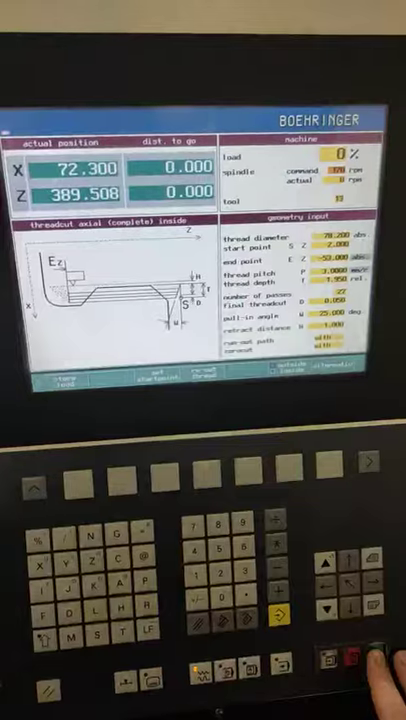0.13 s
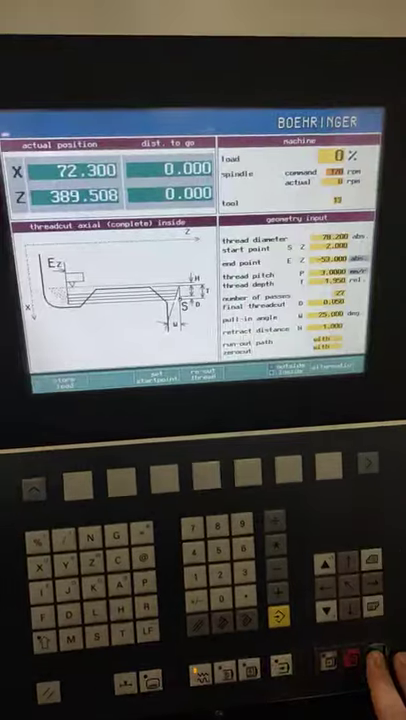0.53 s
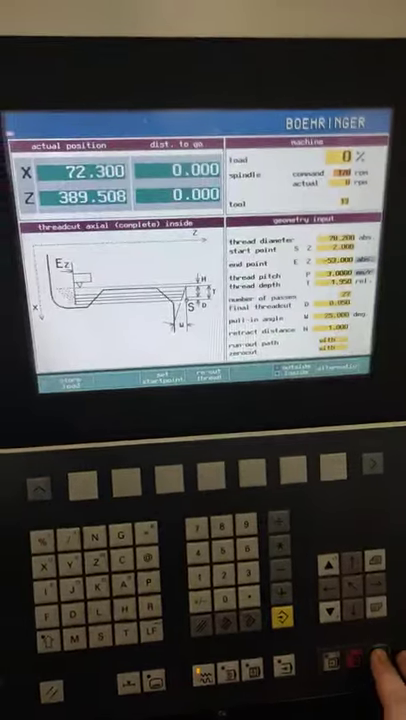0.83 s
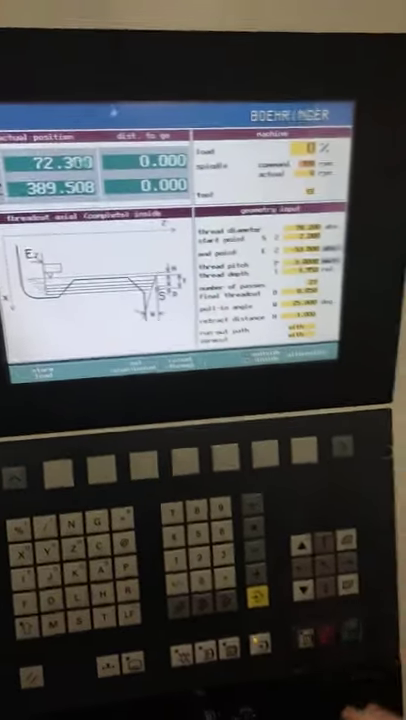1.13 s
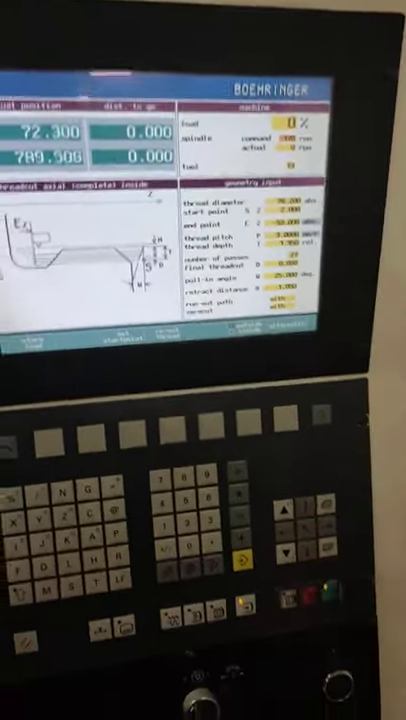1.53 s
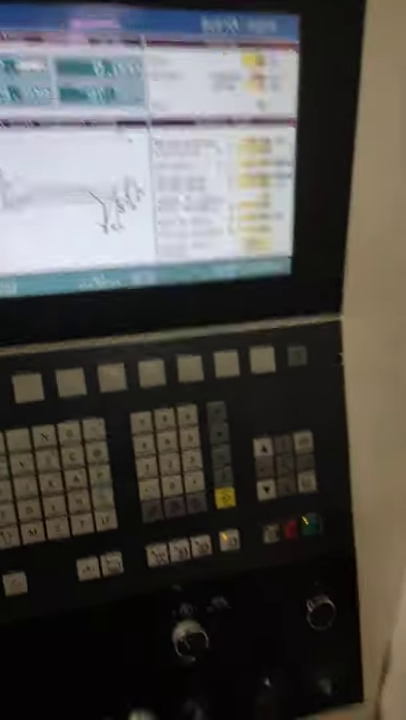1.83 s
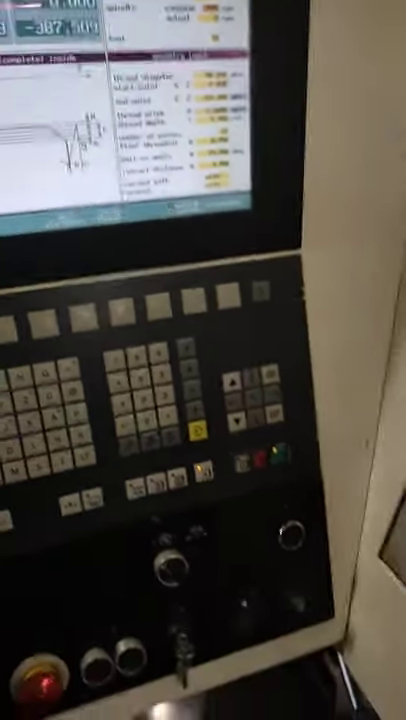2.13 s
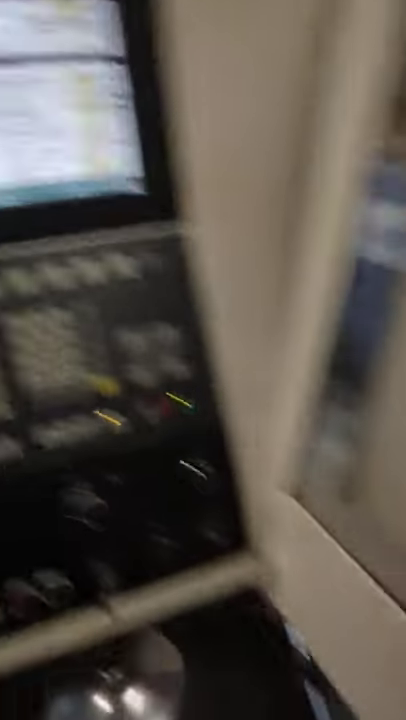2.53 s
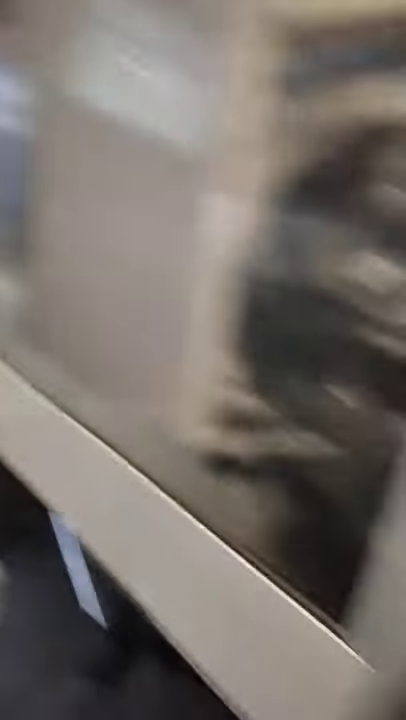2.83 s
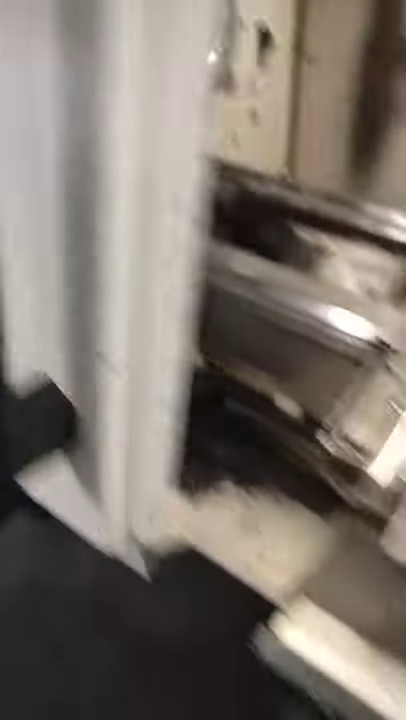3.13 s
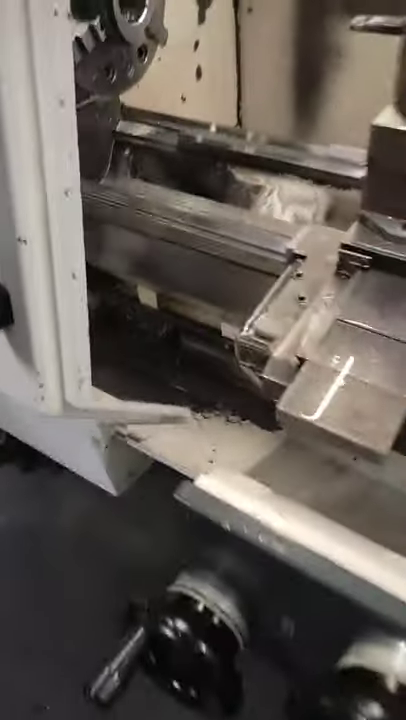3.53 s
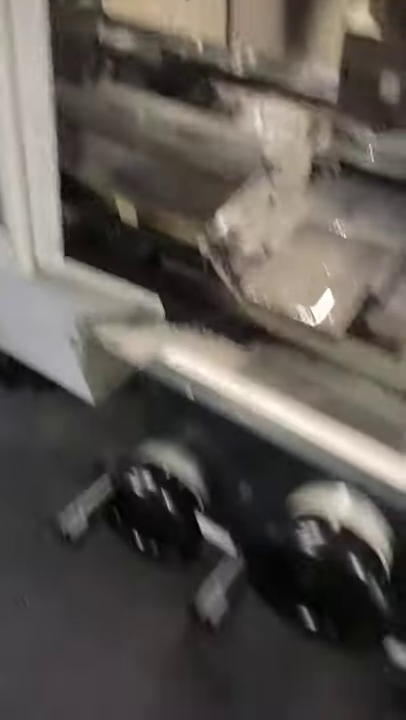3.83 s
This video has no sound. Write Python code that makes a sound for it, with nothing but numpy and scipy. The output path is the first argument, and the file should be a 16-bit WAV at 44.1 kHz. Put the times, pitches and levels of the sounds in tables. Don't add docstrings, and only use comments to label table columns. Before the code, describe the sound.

After a brief silence, a lathe's steady hum and fan whoosh cut in abruptly; dull slide thumps knock the bed, pause, then return near the end under brighter hiss, captured by a handheld stereo phone indoors.

```python
import sys
import numpy as np
from scipy import signal
from scipy.fft import rfft, irfft, next_fast_len
from scipy.io import wavfile
from scipy.ndimage import uniform_filter1d, map_coordinates

SR = 44100
rng = np.random.default_rng(int(sys.argv[2]) if len(sys.argv) > 2 else 0)


def linear_from_db(decibels):
    return 10 ** (np.asarray(decibels, float) / 20)


def dump_mix(stems):
    frames = np.atleast_2d(stems).T
    limited = np.clip(frames, -1, 1)
    pcm = np.round(limited * 32767).astype(np.int16)
    wavfile.write(sys.argv[1], SR, pcm)


N = 176400

# pitch in [Hz],
# left level first, left last, right first, right last in [dB].
MACHINE_LINES = [(48.4, -47, -44, -46, -44), (101, -29, -37, -30, -38), (144.3, -30, -33, -30, -33),
                 (185, -33, -38, -33, -38), (399, -32, -36, -34, -35), (799, -42, -43, -42, -42),
                 (1060, -50, -42, -37, -41), (1133, -25, -34, -50, -38), (1206, -30, -32, -26, -32),
                 (1269, -44, -40, -42, -41), (1599, -49, -40, -36, -40), (1687, -41, -55, -55, -50),
                 (1745, -52, -39, -48, -39), (1998, -48, -55, -40, -41), (2018, -40, -48, -47, -40),
                 (2046, -48, -46, -37, -41), (4037, -58, -51, -55, -53), (4560, -58, -58, -66, -52),
                 (5146, -58, -52, -54, -56), (10141, -48, -52, -63, -59), (10544, -57, -54, -66, -69),
                 (7930, -61, -57, -51, -49), (8000, -55, -49, -47, -47), (8071, -55, -59, -46, -51)]
# start in [s], level in [dB], start pitch in [Hz], rest pitch in [Hz],
# 60 dB decay time in [s].
BED_THUMPS = [(0.594, -13, 236, 172, 0.55), (.655, -11, 150, 133.3, 0.57), (.77, -11.5, 201, 190, 0.2),
              (.85, -16, 109.4, 102, .5), (1.16, -10, 196.5, 192, 0.16), (1.722, -16.5, 108.4, 103.4, 0.86),
              (1.55, -21.5, 143.8, 142.2, 1.15), (1.801, -23.5, 133, 154, 1.2),
              (1.87, -14.5, 105.7, 103, 0.58), (2.27, -15.5, 147.3, 142.8, 0.87),
              (3.631, -17, 158, 148, 0.34), (1.894, -8.5, 175, 187, 0.48), (2.04, -12.5, 190, 150, 0.35),
              (2.2, -11.5, 189, 183, 0.42), (2.98, -34, 301, 298.4, 0.65), (3.52, -20, 214, 204, 0.37),
              (3.891, -19.5, 264.5, 230, 0.28)]
# time in [s], air hiss in [dB],
# left port hiss in [dB], right port hiss in [dB].
TURN_TO_DOOR = [(0.4, -33, -32, -55), (1.86, -34.5, -32, -44), (1.94, -38, -34, -42),
                (2.17, -32.5, -31, -38), (2.34, -33.5, -31, -36), (2.51, -29, -30, -36),
                (3.33, -29, -26.5, -40.5), (3.66, -30.5, -26.5, -38), (3.68, -27, -24, -42),
                (3.82, -24.5, -24.5, -40), (4.0, -27, -25.5, -40)]
# frequency in [Hz], density in [dB per Hz].
RUMBLE_SPECTRUM = [(20, -46), (60, -33), (80, -21), (96, -8), (288, -3.5), (377, -4.5), (525, -9),
                   (1170, -32.5), (1980, -120)]
# frequency in [Hz], density in [dB per Hz].
FAN_SPECTRUM = [(330, -120), (500, -4.5), (624, -5.5), (749, -7.5), (1170, -3.5), (1500, -7), (1980, -7),
                (5000, -25), (6500, -33)]
# frequency in [Hz], density in [dB per Hz].
AIR_SPECTRUM = [(1200, -120), (2500, 0), (3950, -3.5), (5600, -6), (6700, -6), (7200, -10), (8300, -7),
                (10000, -18.5), (13000, -58)]
# frequency in [Hz], density in [dB per Hz].
LEFT_PORT_SPECTRUM = [(6000, -120), (8500, -53), (9210, -10), (11100, -4), (11700, 2), (12200, 2.5),
                      (14700, -5), (15500, -10), (15900, -50)]
# frequency in [Hz], density in [dB per Hz].
RIGHT_PORT_SPECTRUM = [(7000, -120), (8500, -8), (10000, -1), (11400, -8), (11800, -3), (14900, -4),
                       (15200, -43)]
# frequency in [Hz], left-right correlation in [-1 to 1].
LIKENESS = [(60, 0.89), (130, 1), (290, 0.83), (640, 0.36), (1410, -0.14), (3100, -0.099), (6820, -0.14),
            (15000, -0.2)]
# frequency in [Hz], left over right in [dB].
STEREO_LEAN = [(60, 3), (380, -2.5), (700, 0.5), (1290, -1.5), (2380, -6.5), (4400, 1), (6700, -3),
               (7100, -8.5), (8300, -2.5)]
# frequency in [Hz], threshold over the usual level in [dB].
GATE_THRESHOLD = [(2800, -8), (3700, -1.5), (4600, -1.8), (5600, -.3), (6500, -2), (8000, -2.5), (8400, .2),
                  (9400, .4), (10500, -1.8), (12000, -4)]
# centre in time in [s], level in [dB], length in [s], centre pitch in [Hz].
AIR_PUFFS = [
    (2.55, -37, 0.077, 9800),
    (3.78, -34, 0.14, 4560),
]

RUMBLE_DB, FANS_DB, AIR_DB, LEFT_PORT_DB = -17.5, -18, 4, 6.5
PUFF_WIDTH_HZ = 320
PITCH_WANDER, SHARED_SWAY_DB, OWN_SWAY_DB = 0.0003, 1.4, 1.2
GLIDE_S, SWELL_S, THUMP_ROUGHNESS = 0.069, 0.008, 0.54
START_S, FADE_S = 0.352, 0.00087
DUCK_DB_PER_DB, DUCK_S = 0.23, 0.16
CEILING = 1.4
GATE_DEPTH_DB, TOP_HZ, TOP_OPEN = -45, 15050, 0.2


def unit(x):
    return x / np.sqrt(np.mean(x ** 2) + 1e-20)


def along(points, hz):
    f, v = np.transpose(points)
    return np.interp(np.log(hz + 1), np.log(f + 1), v)


def wobble(rate):
    knots = rng.standard_normal(int(N * 20 / SR) + 8)
    return map_coordinates(knots, [np.arange(N) * min(rate, 20) / SR])


def filtered(x, response):
    m = next_fast_len(N + 8192)
    return irfft(rfft(x, m) * response(np.fft.rfftfreq(m, 1 / SR)), m)[..., :N]


def smoothed(field, bands, frames):
    return uniform_filter1d(uniform_filter1d(field, size=bands, axis=0), size=frames, axis=1)


def rush(spectrum, patchy_db):
    z = signal.stft(rng.standard_normal((2, N)), nperseg=512)[2]
    patches = unit(smoothed(rng.standard_normal(z.shape[1:]), 5, 10))
    pair = signal.istft(z * linear_from_db(patchy_db * patches), nperseg=512)[1][:, :N]

    def mid_side(hz):
        angle = np.arccos(np.clip(along(LIKENESS, hz), -1, 1)) / 2
        return linear_from_db(along(spectrum, hz)) * [np.cos(angle), np.sin(angle)]

    def lean(hz):
        return linear_from_db(np.outer([0.5, -0.5], along(STEREO_LEAN, hz)))

    mid, side = filtered(pair, mid_side)
    return unit(filtered(np.array([mid + side, mid - side]), lean))


def room_rumble():
    return linear_from_db(RUMBLE_DB + 1.7 * wobble(5.15)) * rush(RUMBLE_SPECTRUM, patchy_db=1.23)


def port_hiss(left_db, right_db):
    left = linear_from_db(LEFT_PORT_DB + left_db) * rush(LEFT_PORT_SPECTRUM, patchy_db=0.9)[0]
    right = linear_from_db(right_db) * rush(RIGHT_PORT_SPECTRUM, patchy_db=0.8)[1]
    return np.array([left, right])


def air_hiss():
    s, *columns = np.transpose(TURN_TO_DOOR)
    hiss_db, left_db, right_db = [np.interp(np.arange(N) / SR, s, c) for c in columns]
    air = linear_from_db(AIR_DB + hiss_db + 0.4 * wobble(9)) * rush(AIR_SPECTRUM, patchy_db=1.4)
    return air + port_hiss(left_db, right_db)


def air_puffs():
    t, out = np.arange(N) / SR, np.zeros((2, N))
    for s, db, length, centre_hz in AIR_PUFFS:
        band = filtered(rng.standard_normal((2, N)), lambda f: np.exp(-((f - centre_hz) / PUFF_WIDTH_HZ) ** 2))
        out += linear_from_db(db) * np.exp(-((t - s) / length) ** 2) * unit(band)
    return out


def cabinet_fans():
    return linear_from_db(FANS_DB + 0.89 * wobble(2.24)) * rush(FAN_SPECTRUM, patchy_db=0.7)


def machine_line(hz, *levels_db):
    phase = 2 * np.pi * np.cumsum(hz * (1 + PITCH_WANDER * wobble(8))) / SR
    apart = 1 - np.clip(along(LIKENESS, hz), 0, 1)
    turn = np.arange(N) / N
    shared_db = SHARED_SWAY_DB * wobble(5.65)
    sides = []
    for first_db, last_db in np.reshape(levels_db, (2, 2)):
        own_db = first_db + (last_db - first_db) * turn + apart * OWN_SWAY_DB * wobble(4.2)
        offset = apart * 2 * np.pi * rng.random()
        sides.append(np.sqrt(2) * linear_from_db(shared_db + own_db) * np.sin(phase + offset))
    return np.array(sides)


def motors():
    return sum(machine_line(*row) for row in MACHINE_LINES)


def slide_thumps():
    out, t = np.zeros(N + SR), np.arange(SR) / SR
    for s, db, start_hz, rest_hz, t60 in BED_THUMPS:
        pitch_hz = rest_hz + (start_hz - rest_hz) * np.exp(-t / GLIDE_S)
        phase = 2 * np.pi * np.cumsum(pitch_hz) / SR
        rough = 1 + THUMP_ROUGHNESS * map_coordinates(rng.standard_normal(64), [t * 45])
        envelope = linear_from_db(db + 2.5 - 60 * t / t60) * (1 - np.exp(-t / SWELL_S))
        out[round(s * SR):][:SR] += envelope * rough * np.sin(phase)
    return out[:N]


def scene():
    return room_rumble() + air_hiss() + air_puffs() + cabinet_fans() + motors() + slide_thumps()


def gain_control(x):
    power = uniform_filter1d(np.mean(x ** 2, 0), int(DUCK_S * SR))
    level_db = 10 * np.log10(np.abs(power) + 1e-9)
    gain = linear_from_db(-DUCK_DB_PER_DB * np.maximum(level_db - np.median(level_db), 0))
    return CEILING * np.tanh(x * gain / CEILING)


def treble_dropouts(x):
    hz, t, z = signal.stft(x, SR, window="cosine", nperseg=2048)
    power = smoothed(np.mean(np.abs(z) ** 2, 0), 4, 2)
    usual = smoothed(power, 31, 9)
    threshold = linear_from_db(2 * along(GATE_THRESHOLD, hz))[:, None]
    weak = (power < usual * threshold) & (hz > GATE_THRESHOLD[0][0])[:, None]
    closed = rng.random(len(t)) > TOP_OPEN * (1 + 3 * t / t[-1])
    shut = np.repeat(closed, 3)[:len(t)] & (hz > TOP_HZ)[:, None]
    gain = np.where(weak | shut, linear_from_db(GATE_DEPTH_DB), 1)
    return signal.istft(z * gain, SR, window="cosine", nperseg=2048)[1][:, :N]


def roll_off(x):
    return signal.sosfilt(signal.butter(12, 15550, fs=SR, output="sos"), x)


def record(dry):
    opened = np.clip((np.arange(N) / SR - START_S) / FADE_S, 0, 1)
    mix = treble_dropouts(gain_control(dry)) * opened
    return roll_off(mix)


dry = scene()
out = record(dry)
dump_mix(out)
```